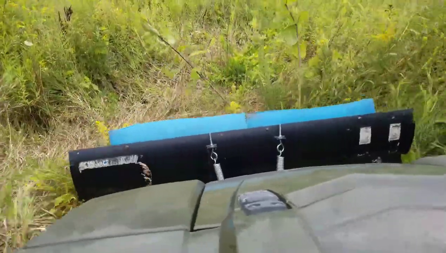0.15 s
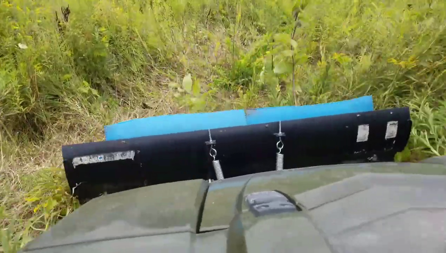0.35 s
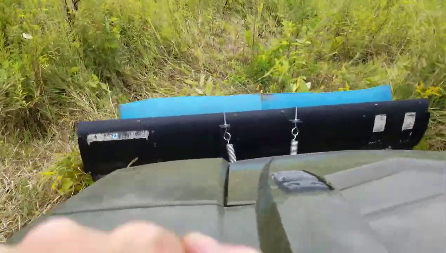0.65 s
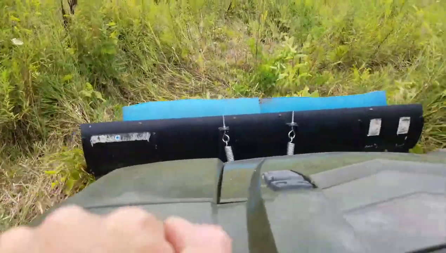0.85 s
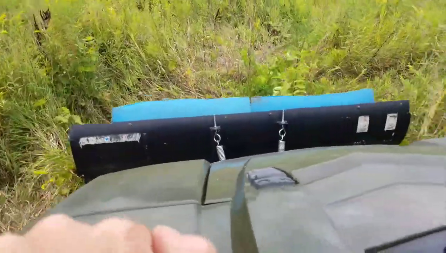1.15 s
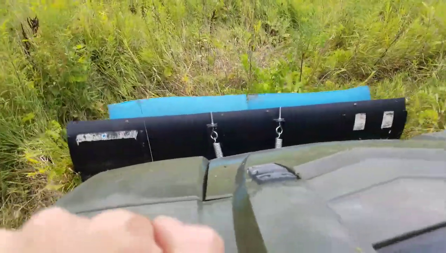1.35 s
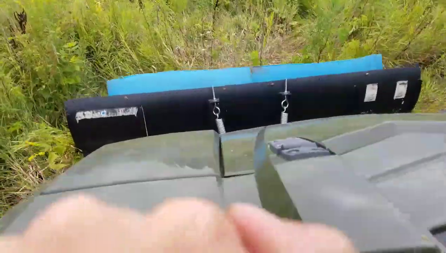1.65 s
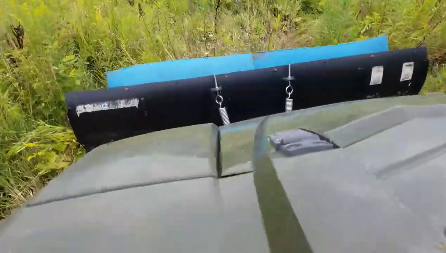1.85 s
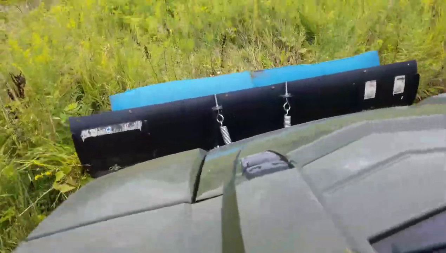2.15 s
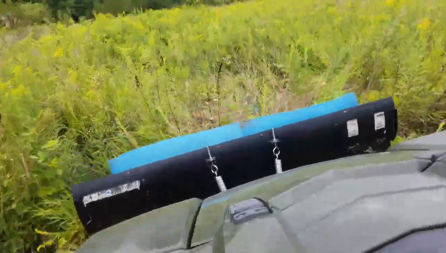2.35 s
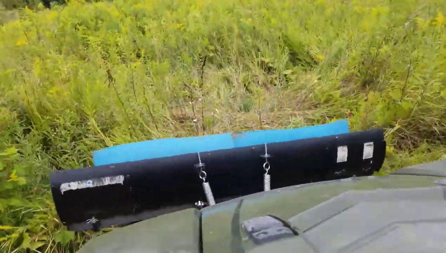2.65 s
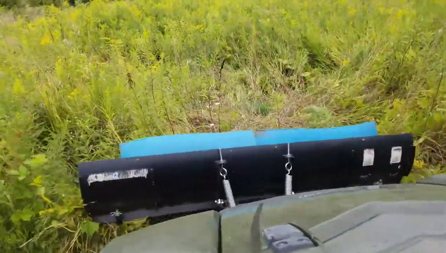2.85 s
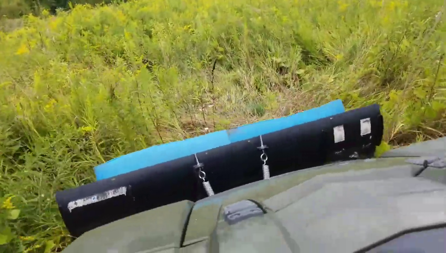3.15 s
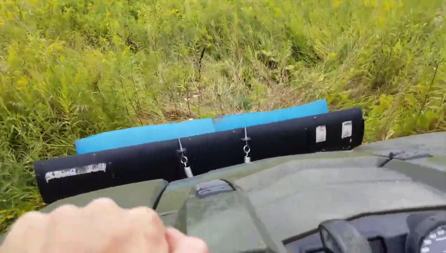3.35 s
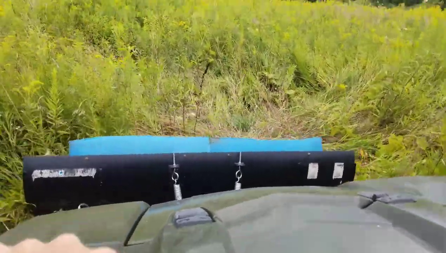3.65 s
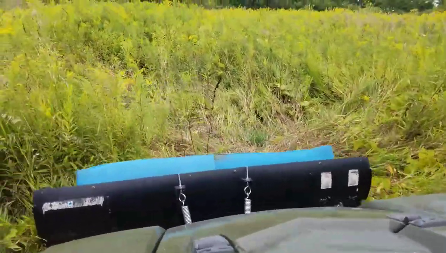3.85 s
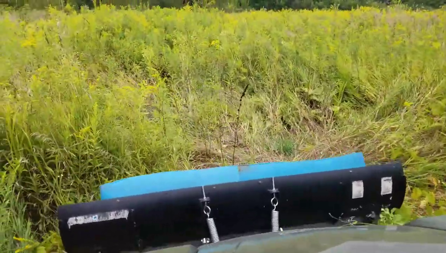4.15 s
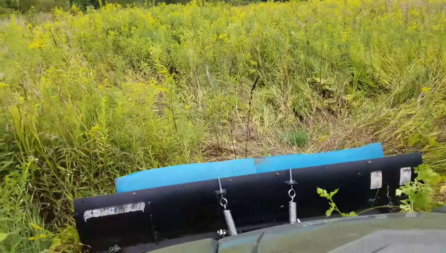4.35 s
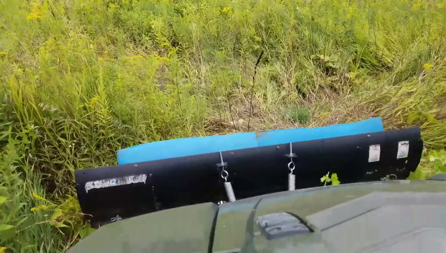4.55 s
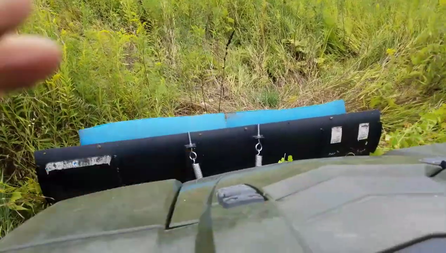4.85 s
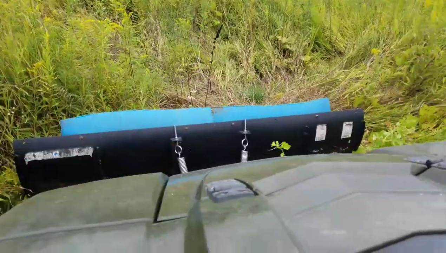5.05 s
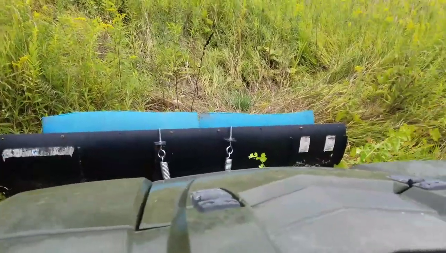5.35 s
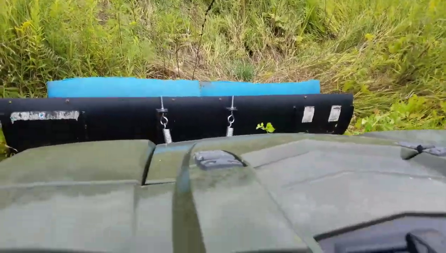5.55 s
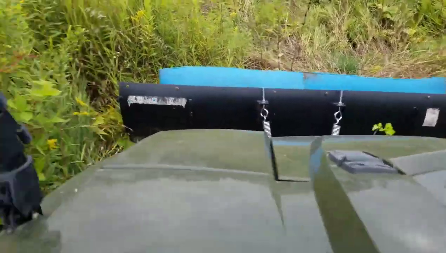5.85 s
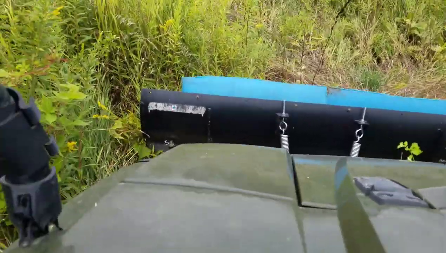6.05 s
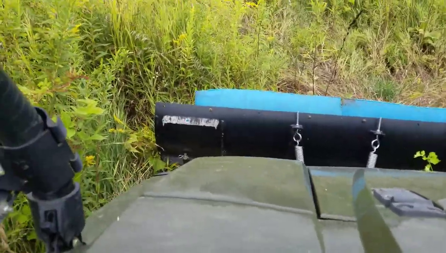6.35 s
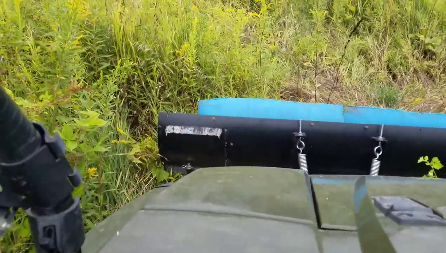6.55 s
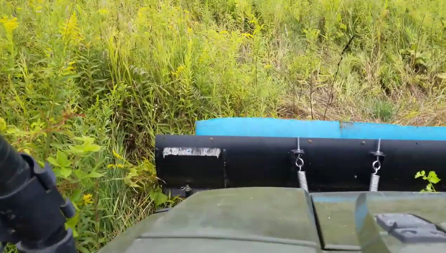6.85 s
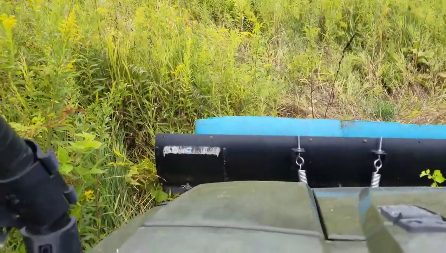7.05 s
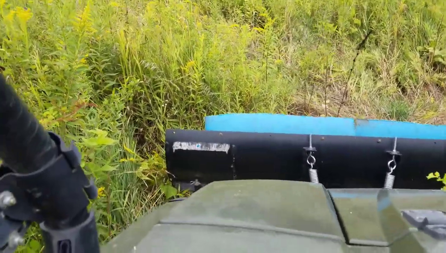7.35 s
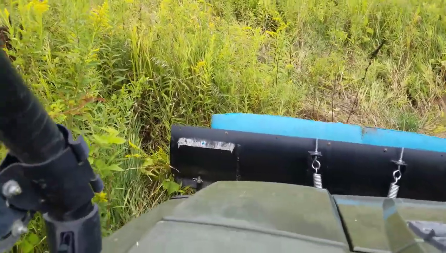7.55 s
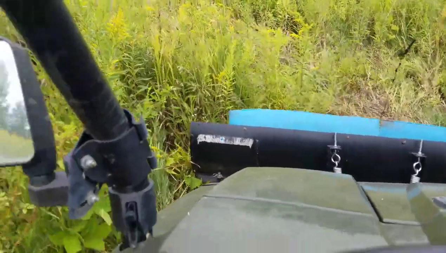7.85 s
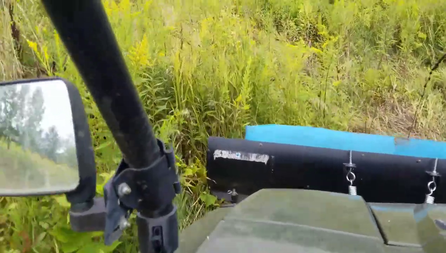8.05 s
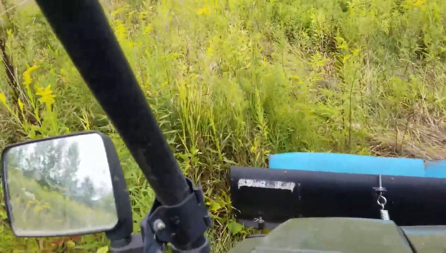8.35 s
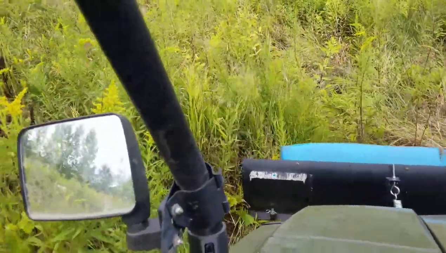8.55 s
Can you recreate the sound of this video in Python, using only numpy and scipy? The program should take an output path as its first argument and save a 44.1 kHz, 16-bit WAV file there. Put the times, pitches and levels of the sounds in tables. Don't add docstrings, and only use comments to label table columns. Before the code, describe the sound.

From the driver's seat of a utility vehicle, a single-cylinder engine throbs deeply with belt roar and ticking valves while leaves scrape and twigs snap. It slows, and the front blade clanks and thuds over bumps. After a brief surge it sinks to a slow idle, faint insects behind, then revs and pulls away with a cluster of cracks and knocks. Close stereo handheld sound in an open field.

```python
import sys
import numpy as np
from scipy import signal
from scipy.fft import rfft, irfft, next_fast_len
from scipy.io import wavfile
from scipy.ndimage import uniform_filter1d, map_coordinates

SR = 44100
rng = np.random.default_rng(int(sys.argv[2]) if len(sys.argv) > 2 else 0)


def int16_out(signal):
    q = np.round(np.clip(np.atleast_2d(signal).T, -1, 1) * 32767)
    wavfile.write(sys.argv[1], SR, q.astype(np.int16))


def volts_from_db(level):
    exponent = np.asarray(level, float) / 20
    return 10 ** exponent


N = 383229

# t/s, firing rate f/Hz
CRANK_SPEED = [(0.0, 24.59), (0.42, 27.7), (1.44, 27.0), (2.24, 22.69), (2.42, 16.18), (2.82, 18.34),
               (3.64, 19.74), (4.06, 18.69), (4.68, 28.95), (4.94, 26.33), (5.24, 13.44), (6.04, 10.83),
               (6.66, 11.69), (6.82, 16.09), (7.24, 20.11), (7.46, 25.44), (8.24, 20.85), (8.69, 23.71)]
# t/s, exhaust level/dB, belt drive load level/dB
ENGINE_DEMAND = [(0, -11.5, 5.5), (.34, -13.5, 6), (.84, -14.5, 5.5), (1.28, -13, 5.5), (1.81, -10.5, 1.5),
                 (2.15, -11, -1), (2.5, -15, -1.5), (2.9, -14, 1), (3.4, -13.5, -0.5), (4.15, -13.5, -2),
                 (4.5, -12.5, 3.5), (4.88, -12.5, 2.5), (5.22, -15, -5.5), (6.0, -17.5, -6.5),
                 (6.6, -17, -5.5), (7.15, -13, -1.5), (7.6, -11.5, 7), (8.3, -14.5, 2)]
# t/s, loss level/dB
STUMBLES = [
    (2.19, 4.5),
    (2.33, 1.5),
    (2.5, 5.5),
    (5.22, 4),
]
# f/Hz, level/dB per Hz
ROAR_SPECTRUM = [(20, -40), (40, -20), (100, -7), (165, 2), (200, 1), (250, -4), (300, -8), (400, -8),
                 (480, -13), (750, -17), (1000, -27), (1500, -60)]
# f/Hz, level/dB per Hz
WHIR_SPECTRUM = [(350, -15), (600, -31), (1000, -4), (1350, 2.5), (2400, -7), (3500, -14.5), (4900, -19.5),
                 (5050, -24.5), (5650, -25), (5800, -20.5), (8600, -43), (12000, -51), (16000, -30.5)]
# f/Hz, width/Hz, level/dB
CASING_MODES = [(1125, 260, 0.5), (1440, 180, -6.5), (1630, 190, 1.5), (2380, 270, -2), (2960, 110, -3.5)]
# t/s, contact level/dB
LEAF_CONTACT = [(0, -46), (.14, -41), (1.14, -45), (1.84, -54), (2.1, -52.5), (2.39, -42.5), (2.81, -47),
                (3.12, -49), (3.85, -46.5), (4.26, -58), (4.81, -59), (5.23, -66), (6.61, -72), (7.3, -66),
                (7.36, -56), (7.56, -48), (8.08, -48), (8.69, -46.5)]
# f/Hz, level/dB per Hz
LEAF_SPECTRUM = [(590, -28.5), (1000, -1.5), (1190, 1), (1480, -18.5), (2390, -11), (2620, -17),
                 (2840, -10.5), (3080, -15.5), (5760, -18), (9830, -26.5), (12500, -19), (15100, -3.5),
                 (16000, -10.5)]
# t/s, peak level/dB, stem body level/dB, t60/s, left-right level/dB
STALK_SNAPS = [(0.822, -13.5, -6.5, 0.11, 3), (.957, -19.5, -13.5, 0.038, 2.5),
               (1.302, -23.5, -8.5, 0.13, -3.5), (2.052, -38.5, 12.5, 0.12, -11),
               (2.411, -20.5, -13, 0.068, -5.5), (2.461, -25.5, 0, 0.043, -0.5),
               (2.584, -25.5, 0.5, 0.12, -2), (2.723, -19, -13.5, 0.056, -2),
               (2.945, -13.5, -17, 0.21, -2.5), (3.088, -26.5, -20, 0.065, 1.5), (3.449, -31, 3, .06, -8.5),
               (3.947, -13.5, -8.5, .13, 2), (4.854, -40.5, 13.5, 0.13, -1.5),
               (6.306, -18.5, -0.5, 0.098, 3.5), (7.42, -35, 1.5, 0.15, 8), (7.606, -24.5, -13, .11, 11.5),
               (7.788, -26, -4.5, 0.086, 11.5), (7.854, -22.5, 2, 0.11, 14.5), (7.92, -19.5, -33, .06, 2.5),
               (7.987, -18, 4.5, 0.11, 20), (8.08, -19, -1, .16, 15), (8.391, -27.5, -5.5, .11, 11),
               (8.542, -23.5, -17, .056, 9), (8.563, -28.5, 6.5, 0.11, 10.5)]
# t/s, peak level/dB, left-right level/dB
TWIG_FLICKS = [(.093, -30.5, 0), (.137, -26.5, 10.5), (.21, -26, 4.5), (.34, -24, 6.5), (.402, -28, -12.5),
               (.469, -24, 9), (.528, -30.5, -15), (.55, -21.5, 0.5), (.756, -23, -3.5),
               (.859, -28.5, -2.5), (1.039, -31, 8), (1.11, -22.5, 4.5), (1.13, -21, -3.5),
               (1.514, -39.5, -3), (2.203, -34, 3.5), (2.431, -21.5, -7.5), (2.846, -27.5, -3.5),
               (2.874, -36.5, 2.5), (2.928, -22.5, 3.5), (2.995, -32, -2), (3.327, -28.5, 3),
               (3.556, -29.5, 4.5), (3.84, -41.5, -10), (4.177, -38, -11.5), (5.928, -36.5, 0),
               (7.534, -27, 1.5)]
# f/Hz, level/dB per Hz
CRACK_SPECTRUM = [(1180, -30), (2000, -13), (2240, 0.5), (2910, -2.5), (3170, -0.5), (4080, -3.5),
                  (6200, -8), (6700, -11.5), (9490, -21), (15200, -2), (16000, 2)]
# t/s, peak level/dB, clank level/dB, thud level/dB, t60/s
BLADE_KNOCKS = [(2.503, -15.5, -12.5, -10, .17), (2.545, -7, -15, -15, .16), (2.576, -28.5, 2.5, 2, 0.2),
                (2.602, -17, -5, -9, .13), (2.748, -20.5, -10.5, -5.5, 0.98), (2.781, -25, -1.5, -9, 0.15),
                (2.935, -19.5, -12.5, 0, 0.43), (2.995, -21, -9, -11, 0.39),
                (3.468, -17, -23.5, -2.5, 0.18), (3.64, -19.5, -14, 8.5, 0.078), (3.662, -15, -29, 0, .13),
                (3.95, -22.5, -7, -7, 0.13), (4.357, -30, -19, -3.5, .2), (6.309, -25.5, -7, -9.5, 0.1),
                (7.311, -26.5, -16.5, -1.5, .13), (7.463, -23, -14, -4, 0.34), (7.797, -32, -12, -6, 0.13),
                (7.864, -15, -13, -3.5, 0.07), (7.985, -9, -6, -7, .16), (8.008, -7.5, -8, -12.5, 0.099),
                (8.038, -22.5, -30, -2, 0.087), (8.084, -9, -8, -5, .1), (8.126, -15, -14, -4.5, .11)]
# f/Hz, width/Hz, level/dB
FRAME_MODES = [(147, 24.4, 0.5), (250, 67, -3.5), (270, 20, -1.5), (374, 24, -8)]
# f/Hz, width/Hz, level/dB
BLADE_MODES = [(348.5, 44.6, 0.5), (560, 91, -2), (745, 280, -6)]
# f/Hz, width/Hz, level/dB
MOUNT_MODES = [(1112, 120, 14), (1660, 460, 10), (2230, 800, 7.5), (2850, 1300, 1.5), (4740, 900, -45)]
# t/s, f/Hz, peak level/dB, t60/s
PANEL_RINGS = [(2.551, 601, -19.5, .12), (3.472, 259.7, -20.5, .2), (3.488, 369, -16, 0.13),
               (3.642, 860, -30, 0.073), (3.661, 380.8, -16, 0.14), (3.669, 249.3, -19, 0.14),
               (3.64, 200.7, -19.5, 0.14), (6.308, 3670, -33.5, .07), (7.793, 1187, -29, 0.054),
               (7.864, 831, -25.5, .16), (8.012, 256, -16.5, 0.31), (8.012, 366.8, -16.5, 0.2),
               (8.123, 1203, -25, 0.1)]
# f/Hz, level/dB per Hz
INSECT_SPECTRUM = [(4700, -30), (5000, -0.5), (5200, -1.5), (5650, -6.5), (5850, -34.5)]
# f/Hz, left-right level/dB
PORT_DIFFERENCE = [(200, 0), (380, 3), (700, 4), (1290, 6), (2380, 6.5), (4400, 11), (8120, 5), (12000, -8),
                   (15000, -12)]
# f/Hz, correlation (0-1)
PORT_LIKENESS = [(60, .4), (130, .75), (290, .85), (640, .7), (1400, .2), (3000, .05), (15000, .1)]

ROAR_DB, ROAR_PER_LOAD, ROAR_DB_PER_FIRING = -29, 0.3, 0.35
OVERTONE_DB, OVERTONE_PER_LOAD, OVERTONE_DB_PER_FIRING = -25, 0.7, 0.59
CASING_DB = -44.5
UPPER_HZ, UPPER_MS, UPPER_SHARE = 128.4, 10, 0.26
HOT_HZ, HOT_MS, FAST_MS = 3.14, 1.44, 1.77
LIFT_HZ, LIFT_DB = 12, 1
TWIG_BODY_DB, TWIG_T60_S = -13, 0.06
SNAP_RISE_S, KNOCK_RISE_S = 0.0034, 0.0036
RING_RISE_CYCLES, RING_WAVER = 0.89, 0.02
INSECTS_DB = -65


def crank():
    return 0.6 + np.cumsum(curves(CRANK_SPEED, np.arange(N) / SR)[0]) / SR


def exhaust(done):
    number = np.arange(np.ceil(done[0]) - 1, done[-1])
    luck = rng.standard_normal((len(number), 4))
    fired = np.interp(number, done, np.arange(N) / SR, left=-0.02) + 0.00012 * luck[:, 0]
    speed = np.interp(number, done, np.gradient(done) * SR)[:, None]
    idle = np.clip((17 - speed) / 4, 0, 1)
    fast = np.clip((speed - 21) / 3, 0, 1)
    hot = np.clip((speed - 25.6) / 1.4, 0, 1)
    slowing = -np.gradient(speed[:, 0], fired)[:, None]
    lift = np.clip(slowing / 30 - 0.15, 0, 1)
    db, load_db = [c[:, None] for c in curves(ENGINE_DEMAND, fired)]
    over_db = follows(OVERTONE_DB, OVERTONE_PER_LOAD, OVERTONE_DB_PER_FIRING, load_db, speed)
    t = np.arange(5000) / SR

    def ring(hz, ms, turn):
        age = t / ms * 1000
        return age ** 3 * np.exp(-age) * np.sin(2 * np.pi * hz * t + turn)

    uneven = 1 + [0.05, 0.006] * luck[:, 1:3] * (1 - 0.75 * fast)
    uneven_ms, uneven_hz = uneven[:, :1], uneven[:, 1:]
    thump_hz = 101 + HOT_HZ * np.clip(speed - 21.8, 0, 6) - LIFT_HZ * lift
    thump_ms = 4.75 + 1.5 * idle + FAST_MS * fast - HOT_MS * hot
    thump = ring(thump_hz * uneven_hz, thump_ms * uneven_ms, 0.37 - 1.0 * fast)
    thump += (0.52 * idle + 0.2 * fast + 0.07 * hot) * ring(72, 5.2, 2.4)
    thump += UPPER_SHARE * np.maximum(idle, lift) * ring(UPPER_HZ * uneven_hz, UPPER_MS, 0.36)
    push = volts_from_db(-22.5 + 2.5 * luck[:, 2:3]) * ring(37, 4.6, 1.0)
    overtone = volts_from_db(over_db + 0.74 * luck[:, 1:2]) * ring(305.4, 3.77, 0)
    pulses = thump + push + overtone
    pulses /= np.sqrt((thump ** 2).sum(1, keepdims=True) * speed / SR)
    pulses *= volts_from_db(db + 0.8 * luck[:, 3:] - LIFT_DB * lift * np.abs(luck[:, 3:]))
    for s, loss_db in STUMBLES:
        pulses[np.argmin(abs(fired - s + 0.015))] *= volts_from_db(-loss_db)
    at = np.round(fired * SR).astype(int)[:, None] + np.arange(len(t))
    at = np.where(at < 0, N, np.minimum(at, N))
    return np.bincount(at.ravel(), pulses.ravel(), N + 1)[:N]


def machinery(done):
    t = np.arange(N) / SR
    beat = lambda lag, depth_db: volts_from_db(depth_db * np.cos(2 * np.pi * (done - lag)))
    load_db, speed = curves(ENGINE_DEMAND, t)[1], np.gradient(done) * SR
    roar_db = follows(ROAR_DB, ROAR_PER_LOAD, ROAR_DB_PER_FIRING, load_db, speed)
    roar = volts_from_db(roar_db + 1.5 * wobble(12)) * unit(beat(0.085, 2.3) * rush(colour(ROAR_SPECTRUM)))
    whir = unit(beat(1.0, 0.55) * rush(colour(WHIR_SPECTRUM)))
    since_strike = (done + 0.16) % 1
    strike = uniform_filter1d(0.2 + np.exp(-since_strike / 0.17), 250) * volts_from_db(2.5 * wobble(12))
    ticks = unit(strike * rush(lambda hz: np.abs(modes(CASING_MODES)(hz)) ** 2))
    idling = np.clip(1.5 - speed / 24, 0.3, 1)
    casing_level = volts_from_db(CASING_DB + load_db + 1.2 * wobble(9))
    return roar + casing_level * (1.05 * whir + 0.85 * idling * ticks)


def blade():
    s, db, clank_db, thud_db, t60 = np.transpose(BLADE_KNOCKS)
    hz = np.linspace(1, SR / 2, 9000)

    def struck(force, table):
        blows = force * rush(lambda f: 1 / (1 + (f / 3500) ** 2)) / 2
        return filtered(blows, modes(table)) / np.std(modes(table)(hz))

    thud = struck(envelope(s, db + thud_db - 4, 1.29 * t60, KNOCK_RISE_S), FRAME_MODES)
    boom = struck(envelope(s, db - 12, 0.94 * t60, 0.2 * KNOCK_RISE_S), BLADE_MODES)
    clank_force = envelope(s, db + clank_db - 6.5, 0.63 * t60, 0.82 * KNOCK_RISE_S)
    clank = struck(clank_force * volts_from_db(1.8 * wobble(120)), MOUNT_MODES)
    return thud + boom + clank


def rings():
    out, waver = np.zeros(N), 1 + RING_WAVER * wobble(40)
    for s, hz, db, t60 in PANEL_RINGS:
        tone = np.sin(2 * np.pi * hz * np.cumsum(waver) / SR)
        out += envelope([s], db, t60, RING_RISE_CYCLES / hz) * tone
    return out


def weeds():
    scratch = volts_from_db(0.8 * wobble(8) + 1.8 * wobble(25) + 1.6 * wobble(90))
    contact_db = curves(LEAF_CONTACT, np.arange(N) / SR)[0]
    hiss = volts_from_db(contact_db + 5.5) * unit(scratch) * rush(colour(LEAF_SPECTRUM))
    twigs = [(s, db, TWIG_BODY_DB, TWIG_T60_S, pan_db) for s, db, pan_db in TWIG_FLICKS]
    s, db, body_db, t60, pan_db = np.transpose(STALK_SNAPS + twigs)
    sides = np.array([envelope(s, db - 12 + side * pan_db / 2, t60, SNAP_RISE_S) for side in (1, -1)])
    body = envelope(s, db + body_db - 10, 1.1 * t60, SNAP_RISE_S)
    stem = rush(lambda hz: np.abs(modes([(1600, 1500, 0)])(hz)) ** 2)
    crackle = volts_from_db(2.5 * wobble(500))
    return hiss + crackle * (sides * rush(colour(CRACK_SPECTRUM)) + body * stem)


def field():
    song = [(3000, -80.5)] + INSECT_SPECTRUM + [(8000, -80)]
    return volts_from_db(INSECTS_DB + 0.8 * wobble(3.7)) * rush(colour(song))


def follows(db, per_load, db_per_firing, load_db, speed):
    return db + per_load * load_db + db_per_firing * (speed - 20)


def envelope(times, db, t60, rise):
    out, t = np.zeros(N + SR), np.arange(SR // 4) / SR
    for s, level, life, up in np.broadcast(times, db, t60, rise):
        shape = (1 - np.exp(-t / max(up, 1e-4))) * volts_from_db(-60 * t / max(life, 0.005))
        out[round(s * SR):][:len(t)] += volts_from_db(level) * shape / shape.max()
    return out[:N]


def modes(table):
    def response(f):
        total = 0
        for k, (centre, width, db) in enumerate(table):
            damping = 1j * f * width
            total = total + (-1) ** k * volts_from_db(db) * damping / (centre * centre - f * f + damping)
        return total
    return response


def rush(gain):
    turn = lambda hz: np.arccos(np.clip(along(PORT_LIKENESS, hz), -1, 1)) / 2
    shares = lambda hz: gain(hz) * [np.cos(turn(hz)), np.sin(turn(hz))]
    mid, side = filtered(rng.standard_normal((2, N)), shares)
    return unit(np.array([mid + side, mid - side]))


def filtered(x, response):
    m = next_fast_len(N + 8192)
    return irfft(rfft(x, m) * response(np.fft.rfftfreq(m, 1 / SR)), m)[..., :N]


def colour(points):
    return lambda hz: volts_from_db(along(points, hz))


def along(points, hz):
    f, v = np.transpose(points)
    return np.interp(np.log(hz + 1), np.log(f + 1), v)


def curves(rows, t):
    s, *cols = np.transpose(rows)
    return [np.interp(t, s, c) for c in cols]


def wobble(rate):
    knots = rng.standard_normal(int(N * rate / SR) + 4)
    return map_coordinates(knots, [np.arange(N) * rate / SR])


def unit(x):
    return x / np.sqrt(np.mean(x ** 2) + 1e-20)


def scene():
    done = crank()
    engine = exhaust(done) + machinery(done)
    return engine + weeds() + blade() + field() + rings()


def top_cut(x):
    return signal.sosfilt(signal.butter(12, 17090, fs=SR, output="sos"), x)


def record(dry):
    band = lambda hz: (hz < 15900) * (hz > 15)
    ports = filtered(dry, lambda hz: volts_from_db(along(PORT_DIFFERENCE, hz) * [[0.5], [-0.5]]) * band(hz))
    held = ports / (1 + np.abs(ports / 0.9) ** 6) ** (1 / 6)
    return top_cut(held)


dry = scene()
out = record(dry)
int16_out(out)
```